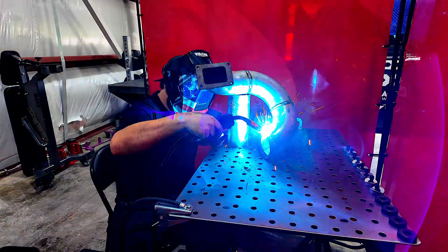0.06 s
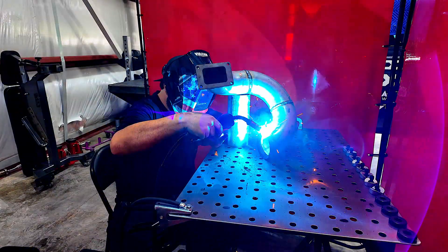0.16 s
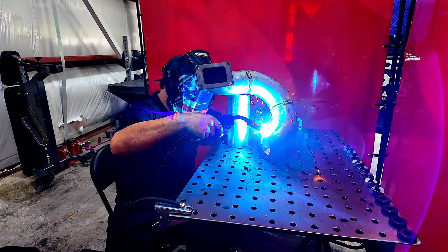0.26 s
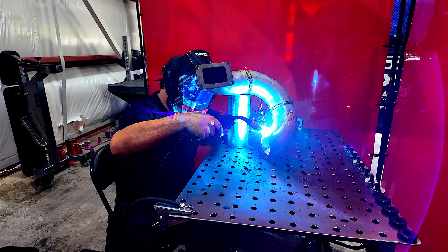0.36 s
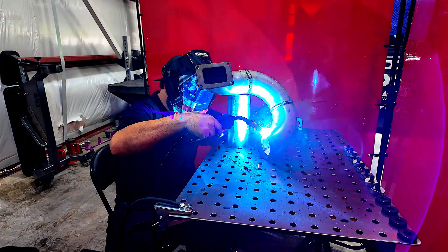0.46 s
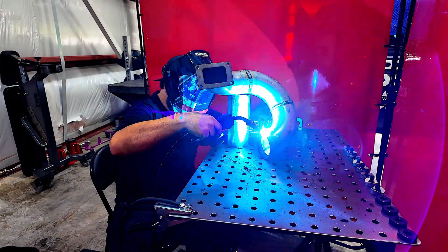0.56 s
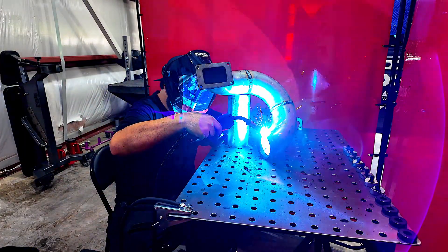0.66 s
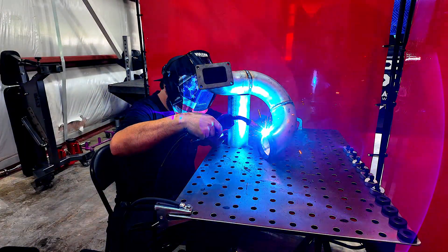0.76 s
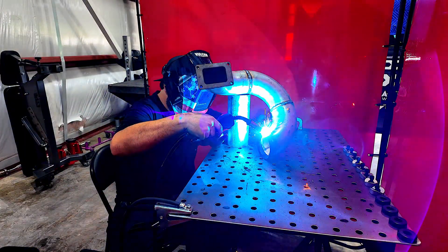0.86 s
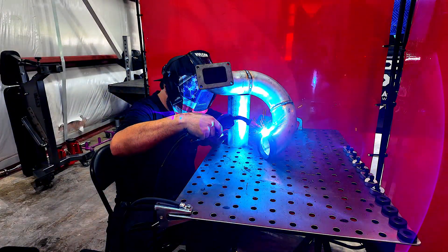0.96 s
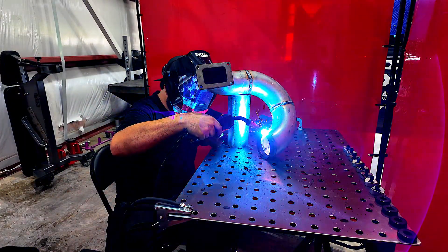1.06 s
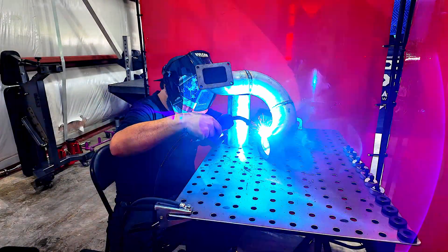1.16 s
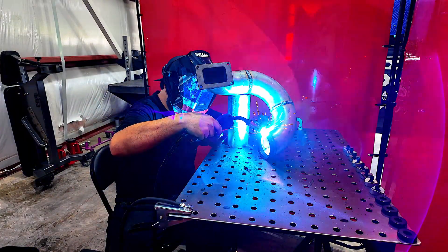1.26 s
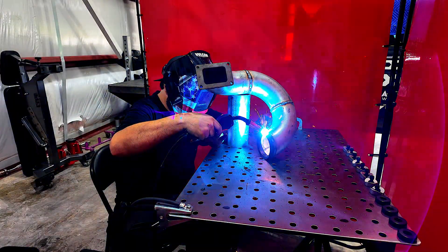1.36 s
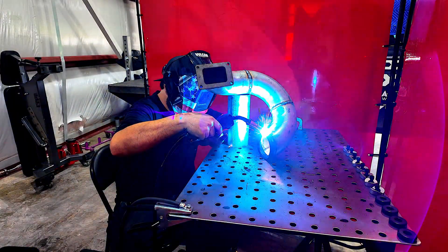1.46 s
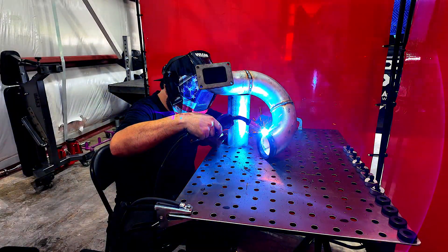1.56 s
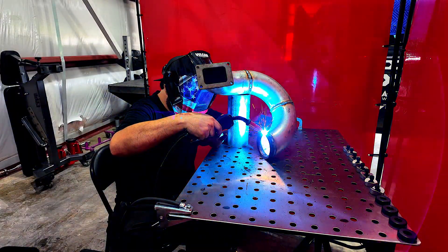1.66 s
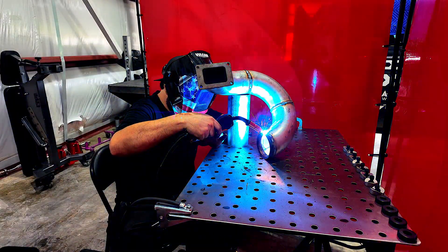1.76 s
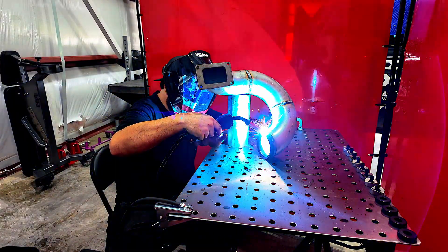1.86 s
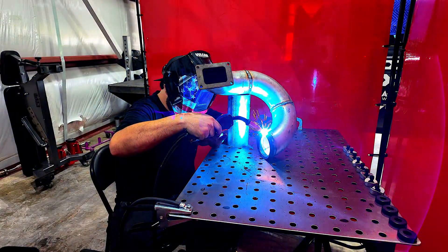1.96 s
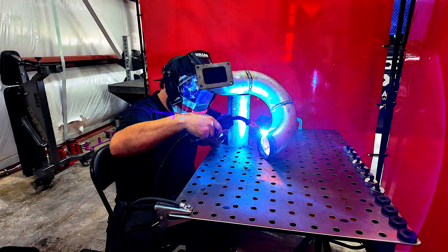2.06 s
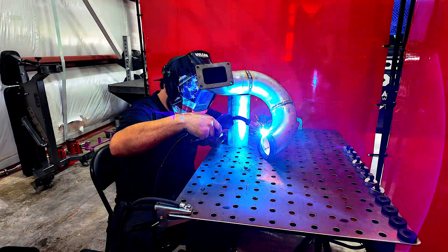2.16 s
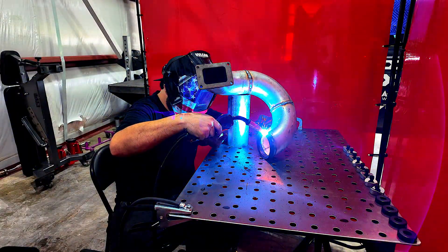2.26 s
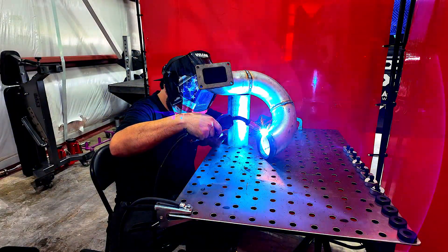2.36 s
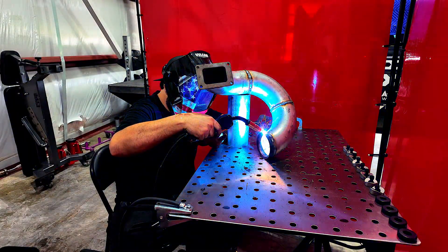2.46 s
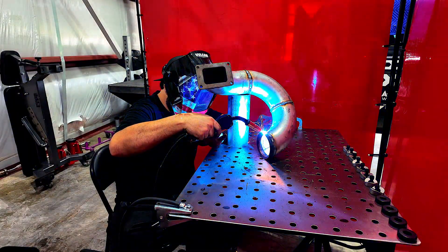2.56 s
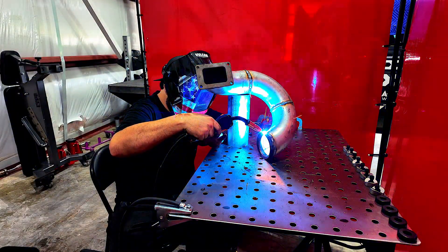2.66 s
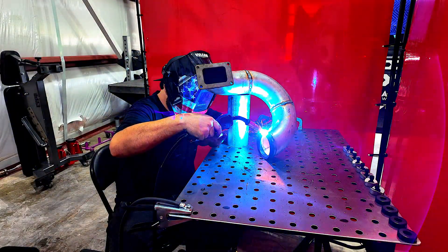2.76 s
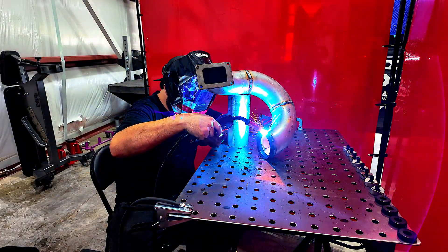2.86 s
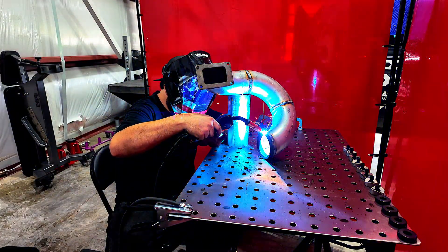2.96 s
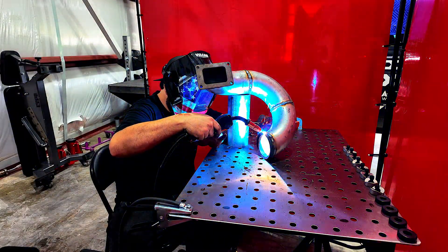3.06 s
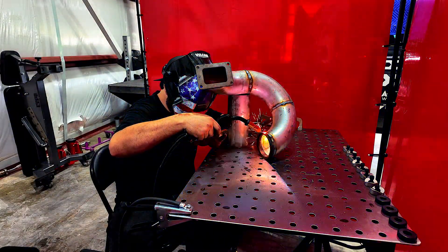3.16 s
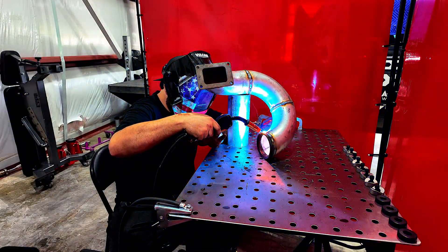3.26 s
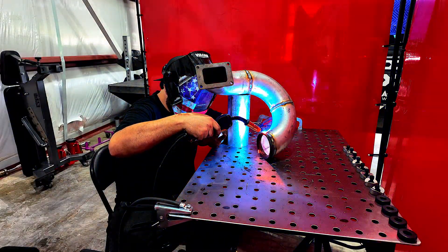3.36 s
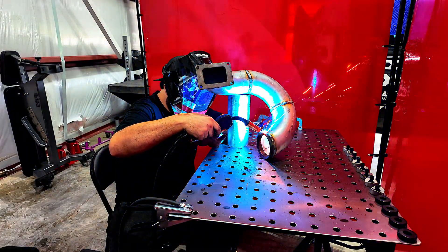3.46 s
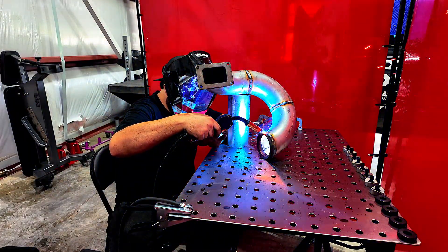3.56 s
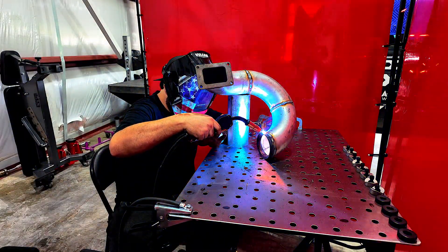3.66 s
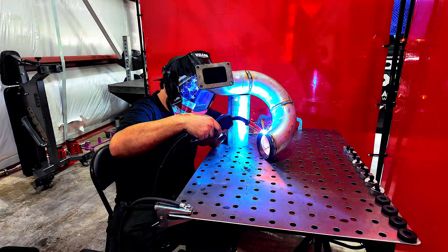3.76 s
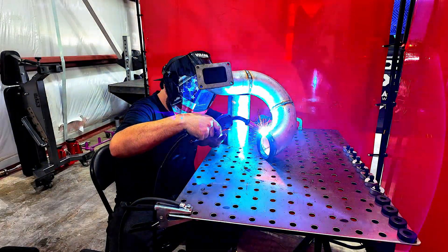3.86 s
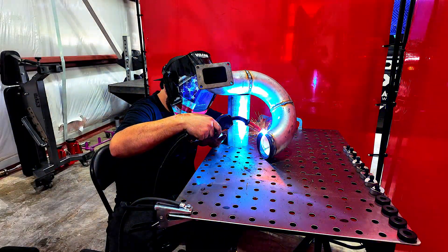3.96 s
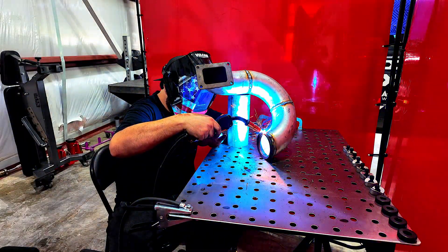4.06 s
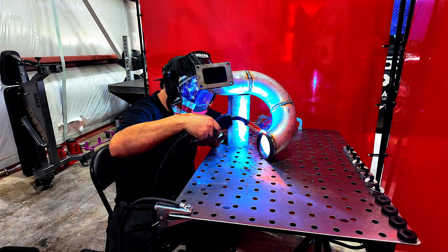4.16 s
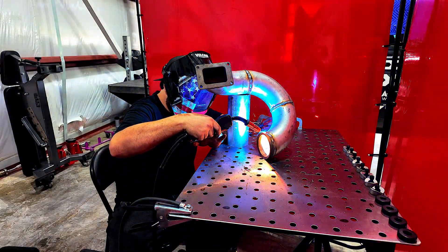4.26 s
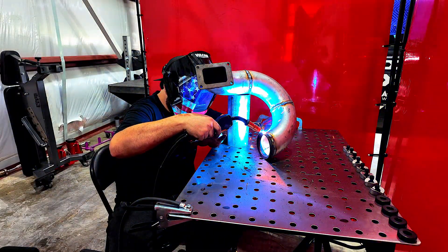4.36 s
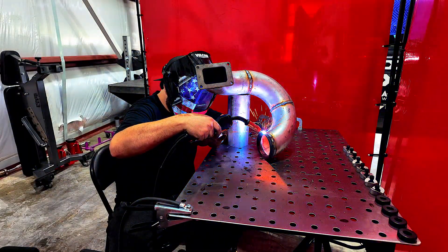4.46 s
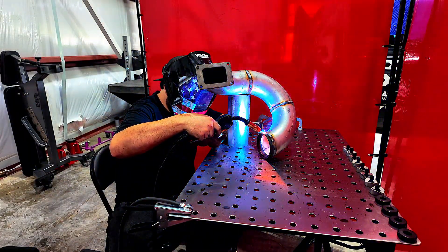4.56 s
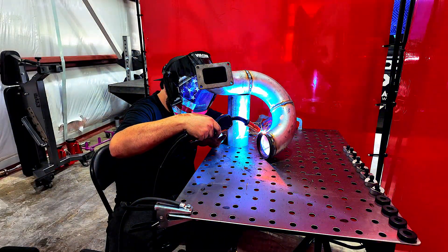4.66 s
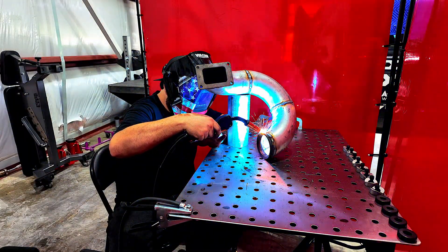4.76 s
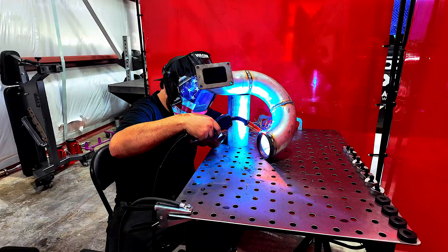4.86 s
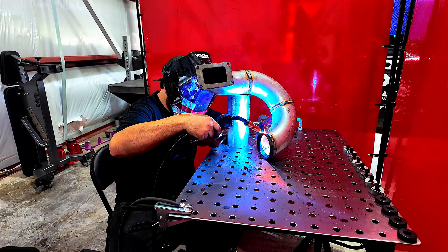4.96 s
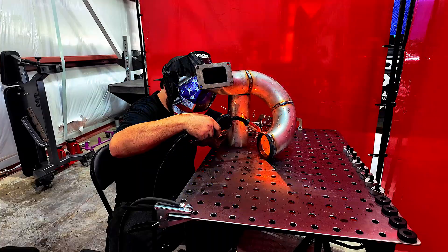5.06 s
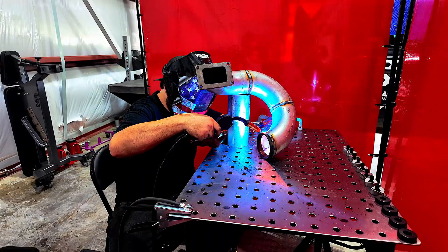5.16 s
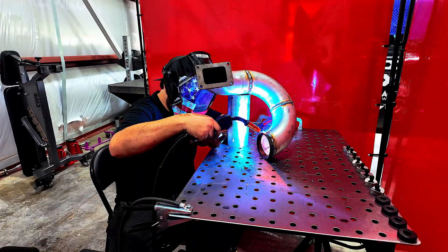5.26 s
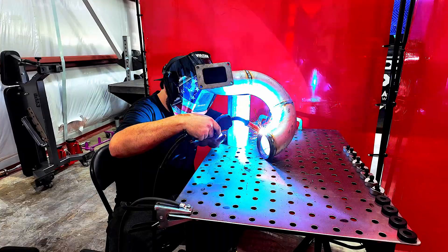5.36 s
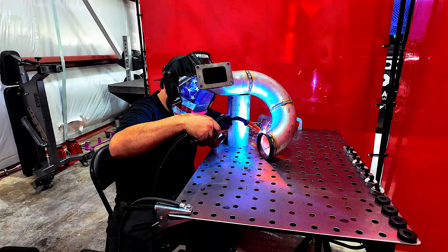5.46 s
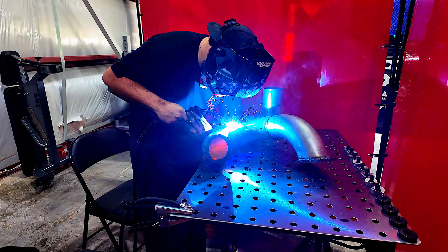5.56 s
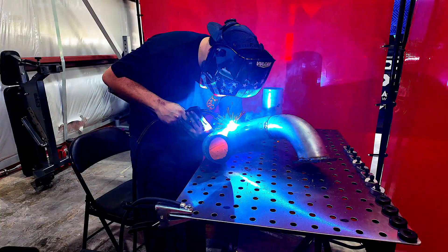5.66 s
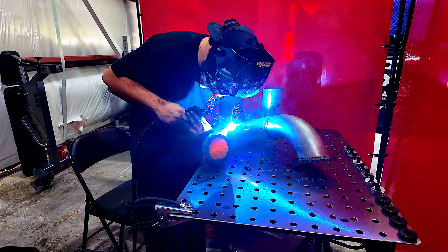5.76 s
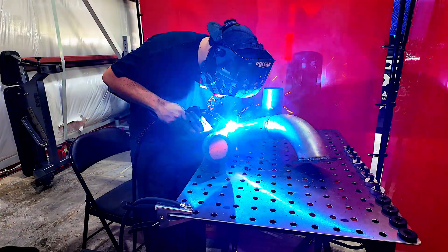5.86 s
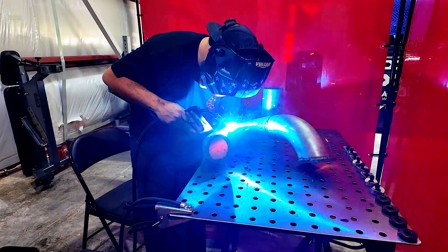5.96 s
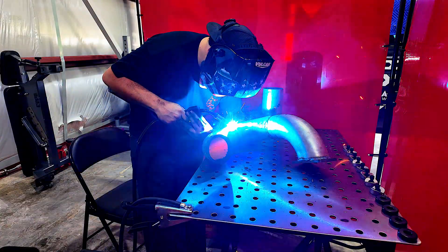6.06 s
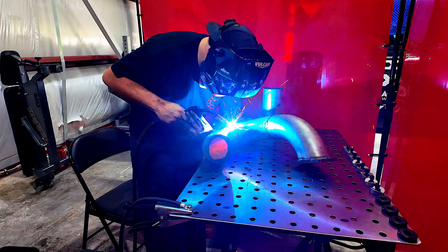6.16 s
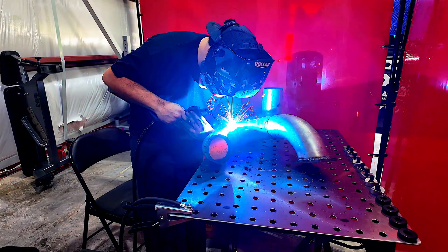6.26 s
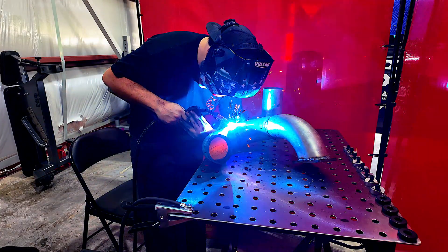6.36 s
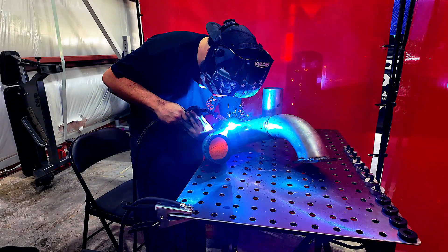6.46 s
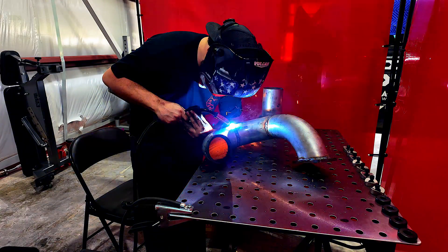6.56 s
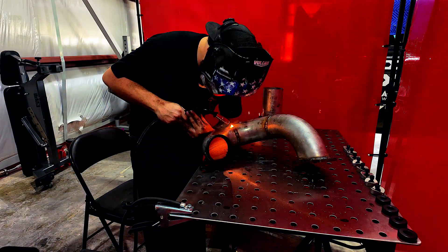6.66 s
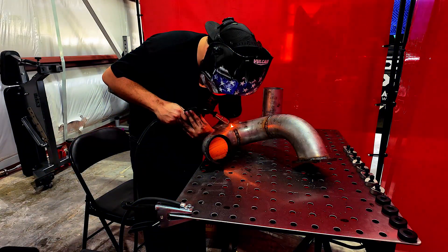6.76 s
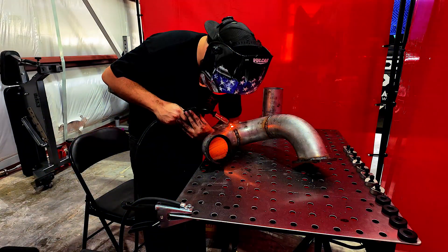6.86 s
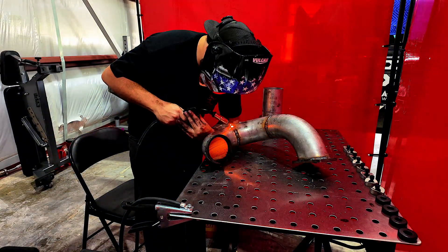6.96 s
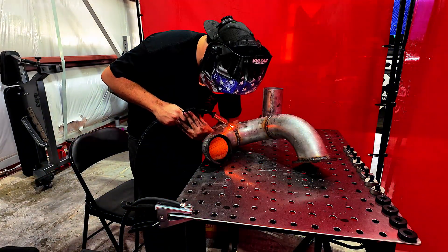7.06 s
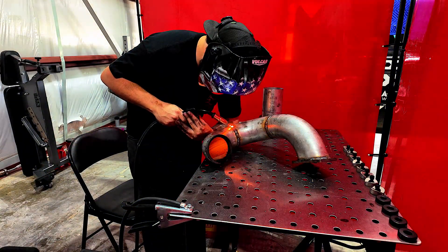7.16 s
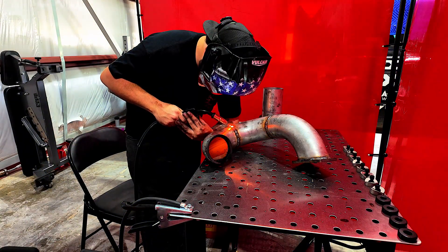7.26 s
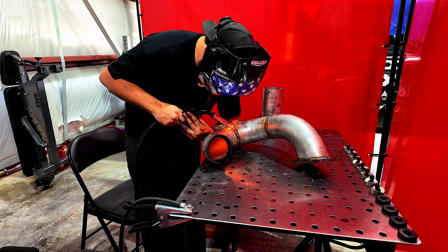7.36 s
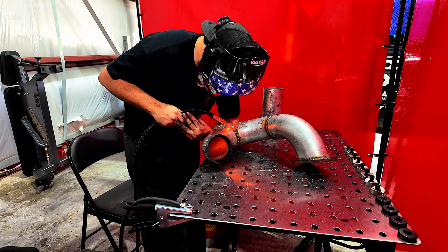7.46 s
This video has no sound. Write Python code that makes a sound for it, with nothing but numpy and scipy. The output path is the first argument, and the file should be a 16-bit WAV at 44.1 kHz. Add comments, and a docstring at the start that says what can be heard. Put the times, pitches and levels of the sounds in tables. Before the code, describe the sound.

A wire-feed welder is already crackling on a steel pipe in a workshop, dozens of pops a second over bright sizzling hiss. Around three seconds it breaks into hard snaps, resumes, breaks again, then runs a thinner, more sputtering third bead. The arc dies, leaving a soft fan rush; a short scrape rings the steel bench and a shuffle with dull thumps follows. Close microphone, short room reverberation, slightly limited top.

```python
"""A crackle of pops opens the scene: a wire-feed welder runs three beads on a steel pipe, the last at a new spot.
The wire shorts and blows free some 70 times a second: each rupture is an impulse with a spray of noise.
Filtered noise hisses between them. Pipe and bench filter the arc, the bore rings and the shop echoes.
Between beads the arc flares or dies; at the end something scrapes on the bench and thumps.
The welder's fan, noise and a few wavering tones, runs throughout."""
import sys
import numpy as np
from scipy import signal
from scipy.fft import rfft, irfft
from scipy.io import wavfile
from scipy.ndimage import map_coordinates

SR = 44100
rng = np.random.default_rng(int(sys.argv[2]) if len(sys.argv) > 2 else 0)


def waveform_to_disk(signal):
    """Save audio, clipped to [-1, 1], as 16-bit WAV at the path in sys.argv[1]."""
    frames = np.transpose(np.atleast_2d(signal))
    scaled = np.clip(frames, -1, 1) * 32767
    samples = np.round(scaled).astype(np.int16)
    wavfile.write(sys.argv[1], SR, samples)


N = 330750
TIME = np.arange(N) / SR  # seconds

# Source levels are relative: filters, echoes and mix gains act on them afterwards.
# loudest pops of the wire blowing free: time_s, level_db (over POP_S)
LOUD_POPS = [(0.0750, -16.5), (0.114, -17), (.1327, -17.5), (0.1693, -15), (0.189, -14.5), (0.2129, -15.5),
             (0.2358, -19), (0.2620, -16), (0.2866, -17), (0.311, -14.5), (0.3363, -18), (0.3556, -14.5),
             (.3825, -18), (0.4756, -18), (.6585, -16.5), (0.6744, -17), (0.6926, -17), (0.7225, -15),
             (0.7507, -14), (0.7924, -14.5), (0.8196, -15), (0.8429, -13), (1.0008, -18), (1.0415, -17),
             (1.2986, -16), (1.3405, -14), (1.3634, -16.5), (1.3816, -15), (1.5775, -17), (1.5995, -14),
             (1.6398, -15), (1.6545, -13.5), (1.8515, -17), (1.8663, -15.5), (1.926, -15), (1.9477, -14),
             (1.9686, -12.5), (1.9985, -15.5), (2.0334, -15), (2.0696, -16), (2.7717, -18), (2.8077, -17),
             (3.0926, -18), (3.164, -17), (3.1855, -19), (3.2852, -9.5), (3.3076, -11), (3.333, -10.5),
             (3.543, -9.5), (3.5905, -18), (3.9700, -11), (4.0010, -12), (4.1796, -17.5), (4.2575, -16.5),
             (4.2820, -10.5), (4.358, -20), (4.588, -14), (4.631, -12.5), (4.6535, -13), (4.7543, -16),
             (4.8165, -16.5), (4.8993, -13), (4.9564, -16.5), (5.2175, -11), (5.4985, -9), (5.557, -24),
             (5.5821, -17.5), (5.6866, -16.5), (5.728, -20), (5.764, -21.5), (5.7811, -20.5), (5.859, -23),
             (5.893, -25.5), (5.9182, -17.5), (5.9685, -17.5), (6.019, -18.5), (6.05, -15.5), (6.075, -18),
             (6.109, -18.5), (6.1554, -18), (6.1837, -20), (6.2074, -20.5), (6.2248, -19), (6.2414, -21),
             (6.2657, -16.5), (6.2913, -21.5), (6.3074, -18), (6.3508, -16), (6.375, -20.5),
             (6.3993, -12.5), (6.433, -24), (6.457, -19), (6.4863, -23.5), (6.5362, -17.5), (6.5612, -19.5),
             (6.587, -22.5), (6.6116, -18.5)]
POP_S = .004  # span over which the level of a pop is reckoned
# hollow booms, where the arc blows through into the pipe: time_s, level_db (over POP_S)
BOOMS = [(.2645, -21), (.851, -22), (.934, -25), (1.929, -25), (2.001, -24), (2.445, -26), (2.774, -26),
         (4.008, -28), (4.286, -28), (4.897, -23), (5.782, -29)]
# a soft low thud where the colour of the arc changes: time_s, level_db (over POP_S)
LOW_THUD = (.0735, -41)

# beads from the wire's first dip into the pool to its last:
# time_s, short_circuit_rate_hz, crackle_db, hiss_db, pop_low_body_db
FIRST_BEAD = [(0, 83, -25, -24.5, 2.5), (.11, 41, -22.5, -27.5, 2.5), (.35, 45.5, -21, -27.5, 1.5),
              (.45, 69, -21, -26, 2), (.72, 47, -20, -27, -3), (.88, 72, -22.5, -26, 3),
              (1.0, 54, -19.5, -24, 3), (1.14, 69, -22, -24, 2), (1.33, 46, -20, -24.5, 3),
              (1.45, 94, -20.5, -23, 2.5), (1.62, 87.5, -19, -23.5, -.5), (1.78, 85, -22, -23, -1.5),
              (2.0, 53, -18.5, -27, 1), (2.16, 86, -20, -20.5, 2), (2.55, 89.5, -24.5, -24, 2.5),
              (2.9, 75.6, -21.5, -24.5, 0.5), (3.2, 66, -23, -26.5, -0.5)]
SECOND_BEAD = [(3.59, 78.3, -19.5, -30.5, -2), (3.75, 82.6, -27, -23.5, 0),
               (4.0, 69.94, -19.5, -25.5, -2.5), (4.2, 53.6, -22.5, -26, -3.5),
               (4.35, 46.5, -25, -25.5, -8), (4.44, 79.5, -20.5, -23, -2.5), (4.7, 61.8, -21, -22, -4),
               (5.0, 66.1, -23, -22, -1.5), (5.2, 76, -20, -28.5, -3.5)]
THIRD_BEAD = [(5.53, 50, -29, -32, 0.5), (5.8, 80, -26, -29.5, 2), (6.0, 33.8, -30, -29.5, -4.5),
              (6.1, 28, -29, -31, -3.5), (6.16, 38.44, -26, -28.5, -3), (6.36, 32.3, -26, -34, -5),
              (6.42, 32, -28, -61, -8.5), (6.49, 32, -32, -40, -6), (6.52, 28, -28, -30, -6.5),
              (6.611, 32, -33, -34, 1)]
BEADS = [FIRST_BEAD, SECOND_BEAD, THIRD_BEAD]
ARC = FIRST_BEAD + SECOND_BEAD + THIRD_BEAD
# hiss outside the dipping, the arc burning free or, at -53 dB, the gas flowing on: start_s, end_s, hiss_db
FREE_HISSES = [(3.2, 3.29, -32.5), (3.3, 3.35, -27.5), (3.535, 3.59, -32.5), (5.2, 5.245, -35),
               (5.3, 5.43, -53), (5.454, 5.48, -21), (6.655, 6.695, -27)]
# torch at the pipe's mouth: start_s, end_s
MOUTH_SPAN = (.072, 5.515)

# colour of the arc in the opening moments: frequency_hz, gain_db
START_COLOUR = [(60, -33), (280, 0), (1270, 3), (1500, -7), (3200, -1), (6100, 5), (15000, -9)]
# colour of the arc at the pipe's mouth: frequency_hz, gain_db
MOUTH_COLOUR = [(40, -30), (80, -28), (125, -6), (170, -8), (240, -6.3), (300, -9.3), (700, -4.3),
                (1400, -3.8), (3200, -6.5), (4300, -1.5), (7600, -8.5), (10000, -6.3), (13000, -12.5),
                (15700, -12)]
# colour of the arc on the pipe's back: frequency_hz, gain_db
BACK_COLOUR = [(40, -52), (150, -15), (220, -11), (310, -10.5), (1500, -5), (2400, -11.5), (3700, -6.5),
               (5000, -3.5), (8400, -6.5), (10300, -2), (12000, -7.5), (15700, -8)]
# resonances and hollows of pipe, nozzle and bench at the mouth: frequency_hz, width_hz, lift_db
MOUTH_RINGS = [(282, 25, -7), (418, 235, 14.8), (730, 70, -4), (890, 216, 10.5), (1127, 60, 4),
               (1237, 92, -7.5), (1750, 70, -6), (1994, 290, 7.3), (2240, 70, -5), (2470, 76, 4),
               (3060, 43, -7), (2882, 240, 7), (5020, 190, 6.5), (5560, 60, -3), (6200, 340, 7.5),
               (6593, 283, 9.5), (7155, 340, 10.5), (7656, 260, 12), (8060, 610, 5.0), (8626, 640, 9),
               (9300, 210, 5.5), (10596, 530, 4.5), (11800, 270, 5.5), (12470, 181.0, 8), (14300, 730, 7)]
# the same on the back: frequency_hz, width_hz, lift_db
BACK_RINGS = [(311, 33, 9.3), (435, 246, 11.5), (900, 300, 7), (2850, 150, 6), (4120, 140, 6),
              (4880, 400, 8.5), (5220, 260, 7.5), (5400, 90, -7), (5860, 330, 10), (6400, 320, 11),
              (6940, 250, 10), (7460, 330, 9), (7700, 200, -5), (9330, 200, -5), (11250, 550, 9.5),
              (11870, 260, -6), (12770, 800, 6.5)]
# air in the pipe's bore: frequency_hz, level_db, t60_s
BORE_MODES = [(385, 0, .06), (445, -1, .06), (880, -9, .03)]
# reverberation of the shop: frequency_hz, t60_s
SHOP_T60 = [(150, 0.73), (1000, 0.3), (5000, 0.26), (9000, 0.18), (15000, 0.11)]

# rush of the fan: frequency_hz, gain_db
FAN_COLOUR = [(25, -22), (60, -5), (110, -2), (400, -8.5), (2200, -21), (6000, -31), (15000, -58)]
# tones of the fan: frequency_hz, torch_at_mouth_db, torch_elsewhere_db
FAN_TONES = [(120, -66, -71.5), (302, -68, -66.5), (391, -58.5, -73), (528, -68.5, -72.5)]

# scrape on the bench: start_s, swell_s, hold_s, decay_s, level_db
SCRAPE = (6.992, .024, .004, .011, -29.5)
# shuffle on the bench: start_s, swell_s, hold_s, decay_s, level_db
SHUFFLE = (7.288, .025, .06, .016, -44.5)
# soft knocks during the shuffle: start_s, pitch_hz, peak_db
THUMPS = [(7.312, 130, -38.5), (7.343, 190, -38), (7.368, 300, -40.5), (7.425, 118, -49)]
# what the scrape rings in the bench: frequency_hz, level_db, t60_s
BENCH_MODES = [(481, 1, .26), (748, 1, .21), (856, -3, .17), (910, -6, .24), (985, -4, .2), (1265, -9, .26),
               (1427, -8, .26), (1905, -2, .2), (1995, -4, .18), (2643, -6, .12), (2880, -14, .18)]
# colour of the scrape: frequency_hz, gain_db
SCRAPE_COLOUR = [(90, -34), (240, -15), (490, -1), (610, -9), (750, -2), (950, -4), (1200, -12),
                 (1950, -7.5), (3000, -19), (4500, -25), (13000, -52)]
# colour of the shuffle: frequency_hz, gain_db
SHUFFLE_COLOUR = [(35, -17), (80, -5), (135, -2.5), (380, -7), (490, -2), (640, -17), (760, -8), (950, -22),
                  (2000, -41), (13000, -56)]

RISE_DB_PER_S, FALL_DB_PER_S = 897, 698  # how fast each span of hiss comes up and dies
HISS_DB = -0.6  # gain of the hiss against the pops
GAS_DB, BLEED_DB_PER_S = -57, 36.5  # shielding gas alone, and its fall after the last free hiss
STRIKE_BODY_DB = -8  # low body of pops on cold metal between beads
TOP_HZ = 15850  # upper limit of the microphone


def undb(db):
    """Decibels to amplitude ratio."""
    return 10 ** (np.asarray(db) / 20)


def curve(table, axis=1):
    """Linear interpolation in time of one column of a table."""
    rows = np.array(table)
    return np.interp(TIME, rows[:, 0], rows[:, axis])


def over_hz(hz, points):
    """Linear interpolation on a logarithmic frequency axis."""
    f, value = np.transpose(points)
    return np.interp(np.log(hz + 1), np.log(f), value)


def unit(x):
    """Normalisation to rms 1."""
    return x / np.sqrt(np.mean(x ** 2))


def walk(rate):
    """Slow random modulation: straight lines between normal random knots, rate knots per second."""
    knots = rng.standard_normal(N // 20)
    return 1.03 * np.interp(TIME * rate, np.arange(len(knots)), knots)


def cut(x, hz, kind, order=2):
    """Butterworth low-pass or high-pass filtering."""
    return signal.sosfilt(signal.butter(order, min(hz, SR * .45), kind, fs=SR, output="sos"), x)


def through(x, response):
    """Convolution of a sound with an impulse response."""
    return signal.fftconvolve(x, response)[:N]


def body(colour, rings=(), size=4096):
    """Minimum-phase filter of unit energy: a smooth colour plus bell-shaped resonances, by folded cepstrum."""
    hz = np.fft.rfftfreq(size, 1 / SR)
    resonance_db = sum(lift / (1 + (2 * (hz - f) / width) ** 2) for f, width, lift in rings)
    cepstrum = irfft(np.log(undb(over_hz(hz, colour) + resonance_db)))
    cepstrum[1:size // 2] *= 2
    cepstrum[size // 2 + 1:] = 0
    response = irfft(np.exp(rfft(cepstrum)))
    return response / np.linalg.norm(response)


def ringing(modes):
    """Modal response of unit energy: exponentially decaying sines."""
    t = TIME[:SR // 2]
    ring = sum(undb(db - 60 * t / t60) * np.sin(2 * np.pi * hz * t) for hz, db, t60 in modes)
    return ring / np.linalg.norm(ring)


def bounce(x, lag_ms, direct):
    """All-pass reflection between two close surfaces: an inverted direct share, then fading repeats."""
    taps = np.zeros(int(lag_ms * SR / 1000) + 1)
    taps[0], taps[-1] = 1, -direct
    return signal.lfilter(taps[::-1], taps, x)


def impulses(times, sizes):
    """Impulsive excitation: one single-sample crack for each time and size."""
    cracks = np.zeros(N)
    np.add.at(cracks, np.clip(times * SR, 0, N - 1).astype(int), sizes * np.sqrt(POP_S * SR))
    return cracks


def in_bead():
    """Gating by the dipping wire: 1 within a bead, else 0."""
    return sum((TIME > bead[0][0]) & (TIME < bead[-1][0]) for bead in BEADS)


def at_mouth():
    """Gating by torch position: 1 at the pipe's mouth, else 0."""
    return 1. * (TIME > MOUTH_SPAN[0]) * (TIME < MOUTH_SPAN[1])


def short_circuits(jitter_cycles=.18, scatter_db=2.0, delay_db_per_cycle=-1.0):
    """Jittered relaxation cycle: lesser pops fill the gaps between loud ones at the wire's dipping rate."""
    loud_s, loud_level = np.transpose(LOUD_POPS)
    s, rate, crackle_db = np.transpose(ARC)[:3]
    slots = []
    for bead in BEADS:
        start, end = bead[0][0], bead[-1][0]
        edges = np.r_[start, np.sort(loud_s[(loud_s > start) & (loud_s < end)]), end]
        for a, b in zip(edges, edges[1:]):
            dips = max(round((b - a) * np.interp(a, s, rate)), 1)
            slots.extend(np.linspace(a, b, dips + 1)[1:-1])
    late, strong = (np.interp(slots, TIME, walk(100)) for _ in range(2))
    delay = jitter_cycles * late
    lesser_s = slots + delay / np.interp(slots, s, rate)
    # a delayed pop is slightly weaker
    lesser_level = np.interp(slots, s, crackle_db) + delay_db_per_cycle * delay + scatter_db * strong
    return np.r_[loud_s, lesser_s], undb(np.r_[loud_level, lesser_level])


def pops(times, sizes, spray=0.47, spray_s=0.0011, spray_hz=2600,
         body_db=0.8, body_hz=2800, dull_hz=12000, droplet_db=1.8):
    """Rupture of molten bridges: a crack and a decaying bright spray, spread by nozzle and joint."""
    cracks = impulses(times, sizes)
    fade = np.exp(-TIME[:1024] / spray_s)
    spray_envelope = through(cracks, fade / np.linalg.norm(fade))
    spatter = cut(spray_envelope * rng.standard_normal(N), spray_hz, "high")
    burst = cut(cracks + spray * spatter, dull_hz, "low", order=1) / np.hypot(1, spray / 2)
    burst = bounce(burst, lag_ms=.07, direct=.6)
    burst = bounce(burst, lag_ms=.16, direct=.45)
    pool_db = np.where(in_bead(), curve(ARC, axis=4), STRIKE_BODY_DB)
    low_lift = undb(body_db + pool_db + droplet_db * walk(60)) - 1
    return burst + low_lift * cut(burst, body_hz, "low", order=1)


def snap(burst, low_hz=3700, high_hz=6500, snap_db=2.8):
    """Band emphasis: the crack of a pop is strengthened in the low treble."""
    band = signal.butter(1, [low_hz, high_hz], "band", fs=SR, output="sos")
    return burst + (undb(snap_db) - 1) * signal.sosfilt(band, burst)


def rise_and_fall(start, end):
    """Linear attack and decay in decibels: a hiss comes up, holds and dies."""
    return -RISE_DB_PER_S * np.maximum(start - TIME, 0) - FALL_DB_PER_S * np.maximum(TIME - end, 0)


def hiss_level(bead_db=-1.5):
    """Dominance of the strongest source, in dB: beads and free hisses over gas that bleeds away at the end."""
    beads = [curve(bead, axis=3) + bead_db + rise_and_fall(bead[0][0], bead[-1][0]) for bead in BEADS]
    free = [db + rise_and_fall(start, end) for start, end, db in FREE_HISSES]
    gas = GAS_DB - BLEED_DB_PER_S * np.maximum(TIME - FREE_HISSES[-1][1], 0)
    return np.max(beads + free + [gas], axis=0)


def hiss(times, low_hz=4050, high_hz=13500, rumble_db=-24, boil_db=13, back_boil_db=8,
         grain_db=2.5, flutter_db=1.0, slow_hz=62, weave_db=3):
    """Amplitude-modulated noise: within a bead the sizzle sinks after each pop and grows until the next."""
    phase = np.interp(TIME, np.sort(times), np.arange(len(times))) % 1
    dipping = in_bead()
    # the slower the wire dips, the further the arc sinks in each cycle and the more it sputters
    depth = dipping * slow_hz / curve(ARC)
    swing_db = np.interp(phase, [0, .04, .25, .55, 1], [1.5, -4.5, -4.5, .5, 3])
    cycle_db = depth * (swing_db + flutter_db * walk(170))
    sizzle = cut(rng.standard_normal(N), low_hz, "high", order=4)
    sizzle = unit(cut(sizzle, high_hz, "low", order=1))
    # at the mouth the top of the hiss swells and sinks as the torch weaves
    top_lift = undb(weave_db * at_mouth() * walk(5.21)) - 1
    sizzle = sizzle + top_lift * cut(sizzle, 11000, "high", order=1)
    # the pool boils while the wire dips, filling the middle range
    rush_db = rumble_db + dipping * np.where(at_mouth(), boil_db, back_boil_db)
    rush = undb(rush_db) * rng.standard_normal(N)
    return (sizzle + rush) * undb(hiss_level() + cycle_db + grain_db * walk(1400))


def torch(x, share=.2, lag_ms=.7, sway=.3, sway_hz=4):
    """Comb interference: a reflection off the moving torch and glove keeps shifting the arc's colour."""
    lag = lag_ms * SR / 1000 * np.exp(sway * walk(sway_hz))
    return x + share * map_coordinates(cut(x, 2000, "high"), [np.arange(N) - lag], order=1)


def shop(x, room_db=0, late_db=-11.0, early_db=-11, early_s=0.013, gap_s=0.00396):
    """Reverberation: early scatter off welder, screen and floor, then a tail that is shorter in the treble."""
    t = TIME[:SR * 3 // 4]
    hz = np.fft.rfftfreq(len(t), 1 / SR)
    noise = rfft(rng.standard_normal(len(t)))
    centres = [f for f, _ in SHOP_T60]
    late = 0
    for share, (_, t60) in zip(np.eye(len(centres)), SHOP_T60):
        band = irfft(noise * over_hz(hz, list(zip(centres, share))), len(t))
        late = late + band * np.exp(-np.log(1000) * t / t60)
    early = rng.standard_normal(len(t)) * np.exp(-t / early_s)
    parts = [(early * (t > gap_s), early_db), (late * (t > 2 * gap_s), late_db)]
    response = sum(undb(db) * part / np.linalg.norm(part) for part, db in parts)
    return x + undb(room_db) * through(x, response)


def weld(mouth_db=-1.0, back_db=0, start_db=-1, back_room_db=-2.5):
    """Source and filter: the bench echoes the arc closely at the mouth; elsewhere it is in plain view, drier."""
    times, sizes = short_circuits()
    arc = torch(snap(pops(times, sizes)) + hiss(times) * undb(HISS_DB))
    start = through(arc * (TIME <= MOUTH_SPAN[0]), body(START_COLOUR))
    mouth = through(arc * at_mouth(), body(MOUTH_COLOUR, MOUTH_RINGS))
    mouth = bounce(mouth, lag_ms=1.85, direct=0.5)
    back = through(arc * (TIME >= MOUTH_SPAN[1]), body(BACK_COLOUR, BACK_RINGS))
    near_pipe = shop(undb(mouth_db) * mouth + bore(times, sizes))
    in_view = shop(undb(start_db) * start + undb(back_db) * back, room_db=back_room_db)
    return near_pipe + in_view


def fan(wander_rad=0.83, air_db=-62, waver_db=2, nearer_db=4):
    """Broadband flow noise and phase-wandering tones: the rush is louder while the torch is at the mouth."""
    near = at_mouth()
    rush = through(rng.standard_normal(N), body(FAN_COLOUR))
    sound = rush * undb(air_db + nearer_db * near + 0.58 * walk(5))
    for hz, mouth_db, elsewhere_db in FAN_TONES:
        level_db = np.where(near, mouth_db, elsewhere_db) + waver_db * walk(4.1)
        sound = sound + undb(level_db) * unit(np.sin(2 * np.pi * hz * TIME + wander_rad * walk(9)))
    return sound


def bore(times, sizes, stir_db=-21, low_hz=230):
    """Cavity resonance: pops at the mouth stir the bore; those that blow through the joint make it boom."""
    s, db = np.transpose(BOOMS)
    push = impulses(s, undb(db)) + undb(stir_db) * at_mouth() * impulses(times, sizes)
    return cut(through(push, ringing(BORE_MODES)), low_hz, "high")


def low_thud(high_hz=110):
    """Low-passed impulse: one soft low thud."""
    s, db = np.transpose([LOW_THUD])
    return cut(impulses(s, undb(db)), high_hz, "low") * np.sqrt(SR / 2 / high_hz)


def rub(start, swell_s, hold_s, decay_s, db, grain_db=2):
    """Friction noise: a dense run of tiny contacts that swells, holds and dies."""
    age = TIME - start
    push = np.clip(age / swell_s, 0, 1) * np.exp(-np.maximum(age - swell_s - hold_s, 0) / decay_s)
    return undb(db) * push * unit(rng.standard_normal(N) * undb(grain_db * walk(500)))


def thump(start, hz, db, swell_s=.007):
    """Damped oscillation: a soft knock of a few low cycles that swell and die."""
    age = np.maximum(TIME - start, 0)
    return undb(db) * age / swell_s * np.exp(1 - age / swell_s) * np.sin(2 * np.pi * hz * age)


def handling(ring_db=-4):
    """Modal excitation by friction: a scrape rings the steel bench; then a shuffle with soft thumps."""
    scrape = through(rub(*SCRAPE), body(SCRAPE_COLOUR))
    bench = undb(ring_db) * through(rub(*SCRAPE), ringing(BENCH_MODES))
    shuffle = through(rub(*SHUFFLE), body(SHUFFLE_COLOUR))
    return scrape + bench + shuffle + sum(thump(*row) for row in THUMPS)


def scene():
    """Superposition: weld and handling in the shop, over the fan."""
    return (weld() + fan() + low_thud() + shop(handling()))[None]


def record(dry):
    """Saturation and band limiting: the microphone rounds the sharpest pops and cuts the top."""
    rounded = .8 * np.tanh(dry / .8)
    return signal.sosfilt(signal.ellip(10, .2, 70, TOP_HZ, fs=SR, output="sos"), rounded)


dry = scene()
out = record(dry)
waveform_to_disk(out)
```